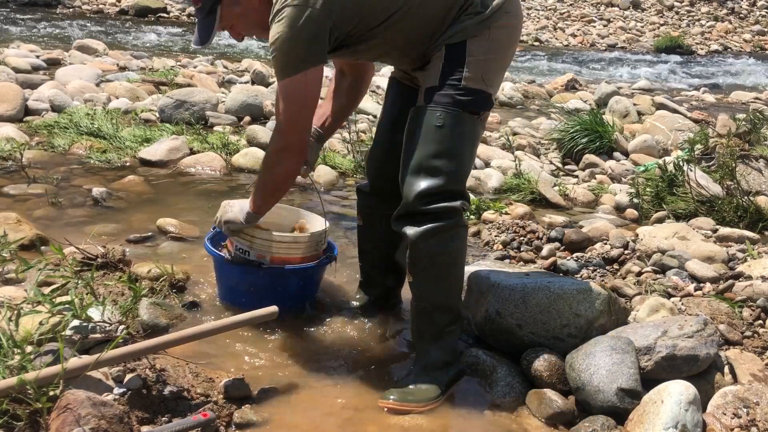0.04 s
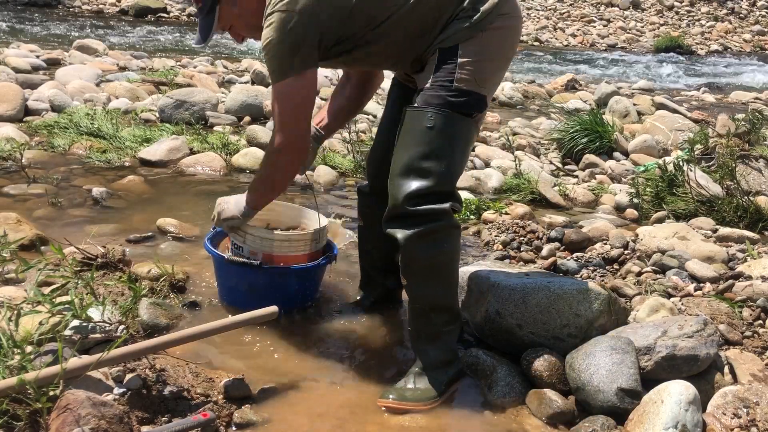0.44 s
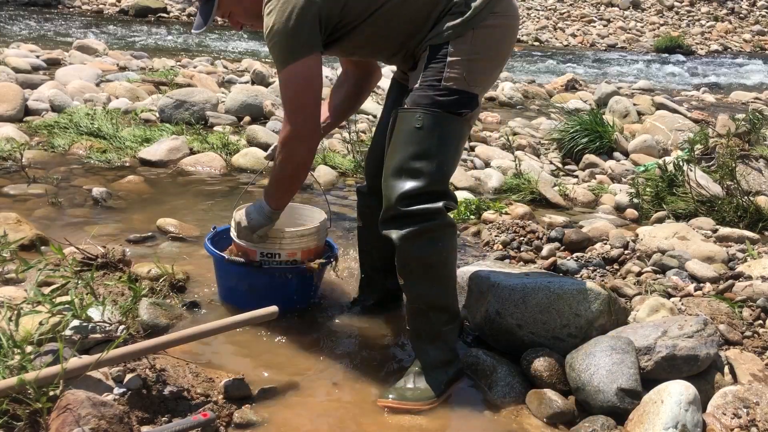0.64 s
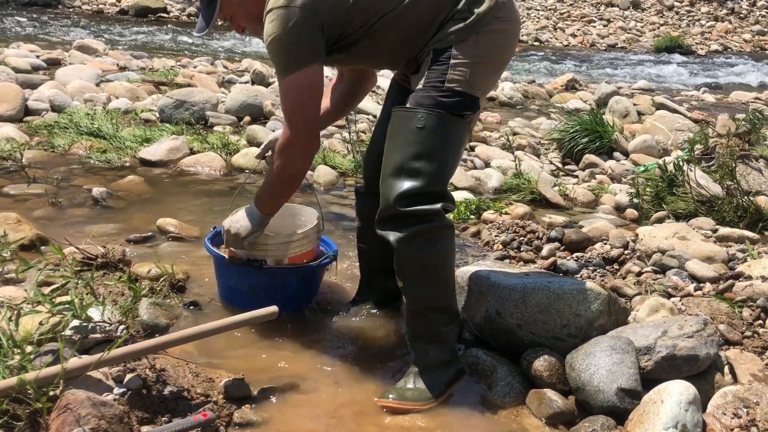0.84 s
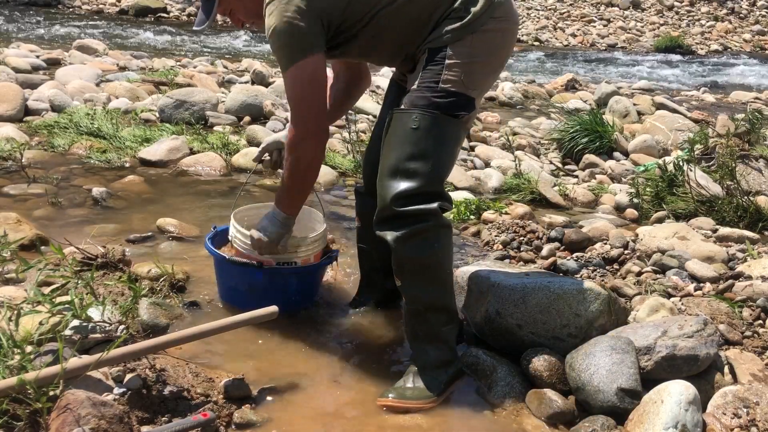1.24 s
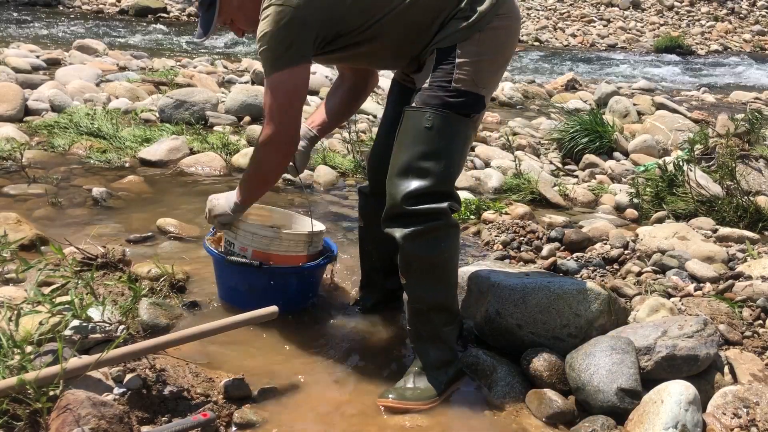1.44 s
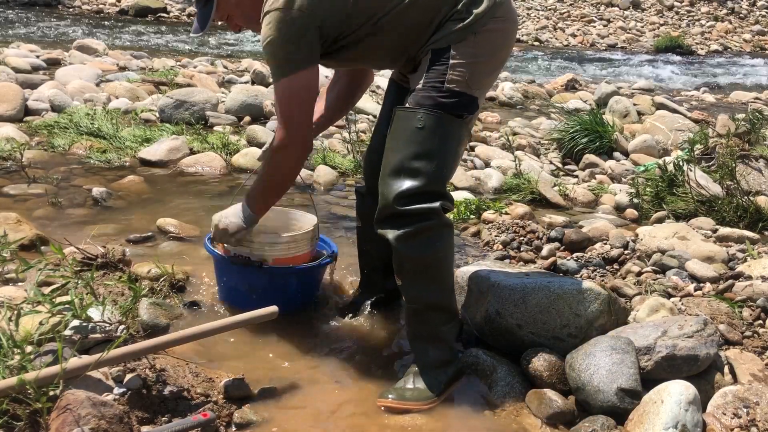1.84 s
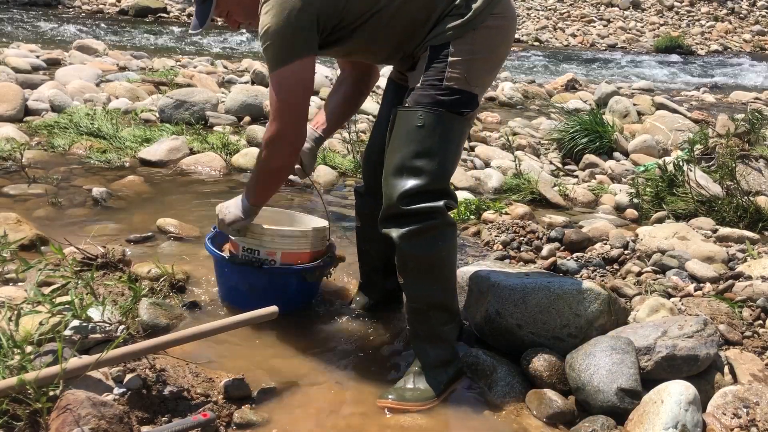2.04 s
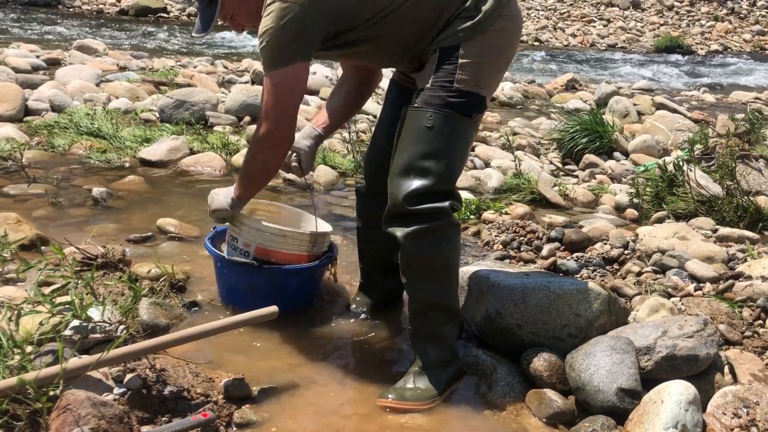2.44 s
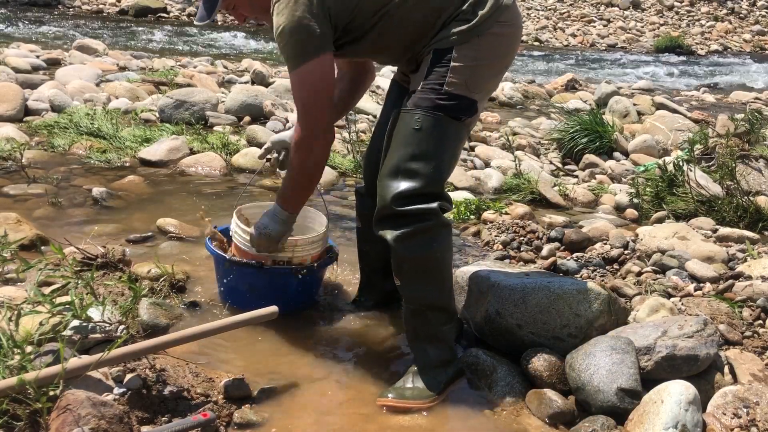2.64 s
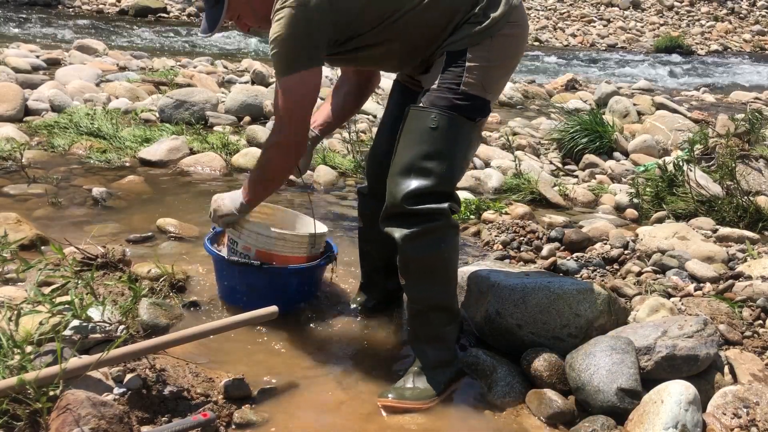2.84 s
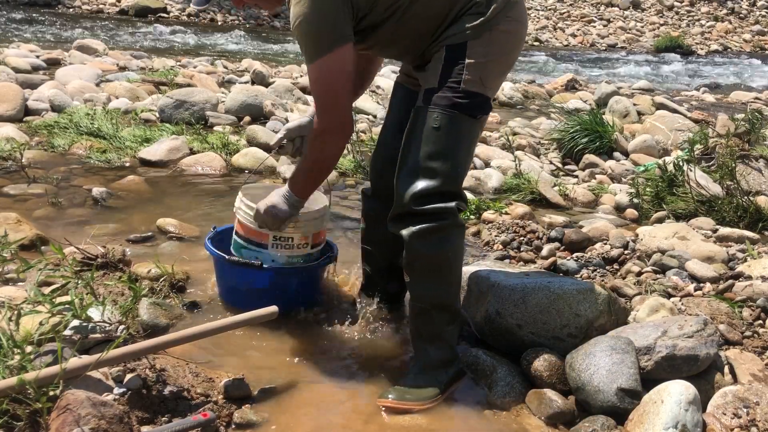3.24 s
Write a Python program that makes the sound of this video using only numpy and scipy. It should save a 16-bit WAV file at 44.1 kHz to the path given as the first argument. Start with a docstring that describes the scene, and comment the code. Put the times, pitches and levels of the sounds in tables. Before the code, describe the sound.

Wet gravel is shaken in a plastic bucket sieve in quick, even strokes. Pebbles clack, grit scrapes and the sieve knocks hollowly against a tub. A river runs faintly behind, and a small splash ends it.

```python
"""Wet gravel is twisted to and fro, about six strokes a second, in a plastic bucket sieve in a tub of water.
Each impact is an impulse filtered by the stone, the bucket's modes and the tub's echo: pebbles clack,
bump the floor and wall, and roll on between strokes. Friction is a dense train of small impacts: grit
scrapes the mesh and a stone grinds along the rim. Flints chink and the sieve thumps the tub.
A river runs behind, and water splashes as the sieve is lifted at the end."""
import sys
import numpy as np
from scipy import signal
from scipy.fft import rfft, irfft, next_fast_len
from scipy.io import wavfile
from scipy.ndimage import uniform_filter1d, map_coordinates

SR = 44100
rng = np.random.default_rng(int(sys.argv[2]) if len(sys.argv) > 2 else 0)


def unload_wav(signal):
    """Save mono or channel-first audio to the path in sys.argv[1] as 16-bit WAV at rate SR, clipped to [-1, 1]."""
    wavfile.write(
        sys.argv[1],
        SR,
        np.round(np.clip(np.atleast_2d(signal).T, -1, 1) * 32767).astype(np.int16),
    )


N = 145530

# Levels in all tables are relative. Spectra (f/Hz, level/dB) of:
RIVER_SPECTRUM = [(25, -23), (50, -32), (90, -7), (140, 0.5), (220, 5), (500, 2), (1000, -0.5), (1800, -11),
                  (3000, -16), (5000, -26.5), (9000, -32.5), (15000, -52)]  # running water
SPILL_SPECTRUM = [(300, -17), (1500, 2), (3300, 5), (5000, -7), (9000, -20), (15000, -24)]  # splashing drops
GRIND_SPECTRUM = [(1500, -32), (2800, -15), (3400, 6.5), (3900, -0.5), (4200, 0), (4650, -9), (5100, -26),
                  (9000, -35)]  # a stone on the rim
FLOOR_SPECTRUM = [(60, -47.5), (160, -24), (270, -18), (350, -11.5), (430, -6), (505, 1.5), (620, -6.5),
                  (900, -18.5), (2000, -46)]  # bumps on the bucket's floor
WALL_SPECTRUM = [(200, -60.5), (550, -20.5), (660, -21.5), (740, -3), (820, -5), (1000, 5.5), (1250, 3),
                 (1700, -18), (3000, -54.5)]  # knocks on its wall
MESH_SPECTRUM = [(500, -55), (1400, -5), (1900, 1.5), (2030, 11), (2130, 5), (2300, 9), (2480, 4),
                 (2850, 0), (3150, 1), (3800, -2.5), (4300, -16), (4750, -11.5), (5300, -48), (9000, -47)]  # grit rasping on the mesh
SAND_SPECTRUM = [(1000, -39), (3500, 9.5), (5000, 2), (6800, -1.5), (8800, -5), (10500, -15.5),
                 (12500, -27), (14500, -37), (16000, -36)]  # fine grains
ROLL_SPECTRUM = [(150, -43), (550, -26.5), (900, -17.5), (1100, -15), (1280, 1), (1450, -2.5), (1620, 3.5),
                 (1820, -4), (2050, -15), (2600, -30), (3500, -24.5), (4500, -38), (9000, -49),
                 (15000, -69.5)]  # gently rolling pebbles
PEBBLE_SPECTRUM = [(100, -54.5), (500, -35), (850, -29), (1080, -9), (1270, 1), (1560, 6), (1820, -2),
                   (2050, -4.5), (2500, -23.5), (3600, -33.5), (5000, -48.5), (9000, -50), (15000, -69)]  # colliding pebbles
# modes of the bucket (f/Hz, level/dB, T60/s)
BUCKET_MODES = [(503, -11.5, 0.058), (756, -18.5, 0.092), (986, -13.5, 0.028), (1260, -13, 0.064),
                (1540, -17, 0.15), (2047, -14.5, 0.081)]
# water leaving the lifted sieve (t/s, level/dB, time constant/s)
SPILL_BURSTS = [(3.239, -59.5, 0.021), (3.248, -62, .005), (3.268, -66, 0.011), (3.285, -49.5, 0.0037)]
# a stone grinding along the rim (centre t/s, half-width/s, level/dB)
RIM_GRINDS = [(1.08, 0.17, -52.5), (2.069, 0.037, -51), (2.232, 0.017, -47.5), (2.261, 0.022, -47)]
# hollow knocks of the sieve against the tub (t/s, f/Hz, level/dB, T60/s)
TUB_THUMPS = [(.348, 472, -34.5, 0.076), (.396, 964, -23, .06), (.402, 747, -28.5, 0.079),
              (.553, 560, -28.5, 0.045), (.697, 804, -29.5, 0.097), (.750, 890, -27.5, 0.11),
              (.765, 400, -39.5, 0.063), (.905, 516, -36.5, 0.14), (1.10, 496, -42, .2),
              (1.235, 531, -41.5, .2), (1.350, 398, -35, 0.11), (1.522, 596, -33.5, 0.069),
              (1.581, 513, -31, 0.087), (1.583, 1028, -20.5, .05), (1.862, 507, -41, 0.053),
              (1.900, 1058, -23, .06), (2.453, 1007, -29.5, 0.11), (2.586, 356, -29.5, 0.071),
              (2.650, 400, -41.5, 0.14), (2.950, 860, -24, 0.048), (2.962, 677, -29.5, 0.087),
              (2.988, 512, -32, 0.089)]
# collisions of small flints (t/s, level/dB, f/Hz)
FLINT_CHINKS = [(0.342, -29, 4070), (.366, -29, 6500), (.398, -33, 8550), (.505, -29, 5550),
                (0.553, -21, 6890), (.701, -23.5, 4260), (1.058, -32, 4230), (1.241, -27, 4630),
                (1.946, -38.5, 7770), (2.094, -37.5, 4660), (2.375, -52, 4200), (2.450, -37, 4100),
                (2.585, -31.5, 5560), (2.620, -36, 5500), (2.950, -36, 4960)]
# hard knocks of large stones (t/s, level/dB)
STONE_KNOCKS = [(0.166, -22), (0.22, -17), (0.247, -21), (0.371, -21), (0.398, -18), (0.423, -22),
                (0.529, -17), (0.658, -20), (0.741, -18), (0.839, -19), (0.873, -15), (1.016, -21),
                (1.172, -17), (1.2, -15), (1.239, -17), (1.344, -21), (1.581, -19), (1.72, -19),
                (1.868, -18), (1.902, -19), (1.918, -21), (2.082, -21), (2.093, -21), (2.231, -21),
                (2.337, -27), (2.373, -27), (2.525, -26), (2.584, -19), (2.763, -23), (2.819, -25),
                (2.95, -18)]
# envelope of the rolling (t/s, level/dB)
ROLLING_LEVELS = [(.125, -70), (.18, -43), (.8, -40.5), (1.4, -40), (1.49, -44), (1.65, -38), (2.02, -42.5),
                  (2.19, -45), (2.38, -40), (2.54, -36.5), (2.72, -43.5), (2.9, -40), (3.03, -48),
                  (3.121, -49.5), (3.18, -73)]
# twists (start t/s, fastest t/s, end t/s, pebble f/Hz, level/dB each of pebbles, floor, wall, mesh, sand)
TWISTS = [(0.164, 0.209, 0.26, 1585, -34.5, -48, -38, -41, -53.5),
          (0.335, 0.38, 0.43, 1593, -40, -50, -39, -42.5, -51),
          (0.498, 0.545, 0.59, 1458, -33, -48, -35.5, -38.5, -48),
          (0.66, 0.72, 0.76, 1540, -36.5, -49, -38, -39.5, -56),
          (0.838, 0.875, 0.9, 1530, -30, -58, -33.5, -37.5, -48),
          (1.012, 1.055, 1.136, 1530, -37, -62, -46, -45.5, -57.5),
          (1.173, 1.222, 1.266, 1496, -30, -54.5, -43, -40, -53.5),
          (1.334, 1.343, 1.433, 1421, -35.5, -56.5, -49.5, -46, -62),
          (1.507, 1.547, 1.625, 1458, -36, -49.5, -42, -41.5, -55.5),
          (1.697, 1.745, 1.772, 1449, -34.5, -58.5, -38.5, -42, -55),
          (1.855, 1.914, 1.955, 1568, -34, -49.5, -47, -45, -58.5),
          (2.062, 2.131, 2.13, 1438, -36, -54.5, -47, -47.5, -70),
          (2.23, 2.255, 2.29, 1557, -32, -55, -44.5, -50, -67),
          (2.421, 2.473, 2.467, 1450, -36.5, -58, -42, -50, -68),
          (2.56, 2.594, 2.65, 1566, -35, -50, -44, -48.5, -59),
          (2.757, 2.793, 2.8, 1556, -36.5, -51, -56, -52, -68),
          (2.919, 2.94, 3.01, 1508, -37, -53, -42.5, -51, -64)]

TUB_T60_S, TUB_DB = 0.038, 3  # short echo inside the tub
HEAP_T60_S = 0.1  # damping by the surrounding gravel
CHATTER = 0.5  # share of the contacts made by one caught, rattling stone
PEBBLE_HZ = 1530  # pitch of a middle-sized pebble
THUMP_DB, KNOCK_DB = -1, -2.5
CHINK_T60_S, CHINK_RING_DB, CHINK_CRACK_DB = 0.0068, -4.5, -5.5
DIP_LEAD_S, DIP_HALF_WIDTH_S, DIP_DB = 0.051, 0.011, -2  # where the twist reverses
STRAY_DB, SNAP_DB = -34, -2.5  # stray grains tick on the mesh; coarse ones crack among the sand
LOW_CUT_HZ, TOP_HZ = 48, 15700


def amp(db):
    """Amplitude ratio of a level in decibels."""
    return 10 ** (np.asarray(db) / 20)


def unit_energy(x):
    """Normalisation to a sum of squares of 1."""
    return x / np.linalg.norm(x)


def gain_at(spectrum, hz):
    """Magnitude response, interpolated in decibels over log frequency."""
    f, db = np.transpose(spectrum)
    return amp(np.interp(np.log(hz + 1), np.log(f + 1), db))


def wobble(knots_per_s):
    """Slow random modulation: a spline through Gaussian values."""
    return map_coordinates(rng.standard_normal(4096), [np.arange(N) * knots_per_s / SR], mode="wrap")


def noise(gain):
    """Spectral shaping: white noise weighted by gain(f), scaled to rms 1."""
    x = irfft(rfft(rng.standard_normal(N)) * gain(np.fft.rfftfreq(N, 1 / SR)), N)
    return x / np.sqrt(np.mean(x ** 2) + 1e-20)


def click(spectrum, stretch, size=2048):
    """A minimum-phase impulse; stretch scales its frequencies, as a stone's size does."""
    cepstrum = irfft(np.log(gain_at(spectrum, np.fft.rfftfreq(size, 1 / SR) / stretch)))
    cepstrum[1:size // 2] *= 2
    cepstrum[size // 2 + 1:] = 0
    return irfft(np.exp(rfft(cepstrum)))


def contact(spectrum, stretch):
    """Convolution of a click with the tub's echo and the bucket's modes, weighted by the spot struck."""
    t = np.arange(SR // 10) / SR
    body = amp(TUB_DB) * unit_energy(rng.standard_normal(len(t)) * amp(-60 * t / TUB_T60_S))
    body[0] += 1  # direct sound
    for hz, db, t60 in BUCKET_MODES:
        mode = unit_energy(np.cos(2 * np.pi * hz * t) * amp(-60 * t / t60))
        body += amp(db - 9.5) * rng.normal(1, 0.18) * mode
    return unit_energy(signal.fftconvolve(click(spectrum, stretch), body))


def shower(force, spectrum, per_s, scatter_db, spread, pitch=1, sizes=14):
    """Shot noise: random contacts scaled by the force, their sizes spanning +-spread in log frequency."""
    chance, strength, free = rng.random(N), rng.standard_normal(N), rng.standard_normal(N)
    caught = free[np.arange(N) * 50 // SR]  # a new stone every 20 ms
    place = np.log(pitch) / spread + np.where(rng.random(N) < CHATTER, caught, free) / 2
    size = np.clip(np.round((place + 1) / 2 * (sizes - 1)), 0, sizes - 1)
    hits = (chance < per_s / SR) * amp(scatter_db * np.minimum(strength, 2)) * rng.choice([-1, 1], N)
    local_power = np.abs(uniform_filter1d(hits ** 2, size=800)) + np.mean(hits ** 2) / 10
    hits = force * hits / np.sqrt(local_power)
    stretches = np.exp(spread * np.linspace(-1, 1, sizes))
    return sum(signal.oaconvolve(hits * (size == k), contact(spectrum, stretch))[:N]
               for k, stretch in enumerate(stretches))


def rings(rows, attack_s, roughness):
    """Damped oscillations (t/s, f/Hz, level/dB, T60/s) whose phase takes one random step a cycle."""
    out, t = np.zeros(N + SR), np.arange(SR // 6) / SR
    for start, hz, db, t60 in rows:
        drift = np.interp(t * hz, np.arange(len(t)), np.cumsum(rng.standard_normal(len(t))))
        envelope = amp(db - 60 * t / t60) * (1 - np.exp(-t / attack_s))
        out[round(start * SR):][:len(t)] += envelope * np.sin(2 * np.pi * hz * t + roughness * drift)
    return out[:N]


def river():
    """Running water: broadband noise with slight amplitude modulation, over a faint narrow-band drone."""
    flow = amp(-59.5 + 0.4 * wobble(knots_per_s=24.4)) * noise(lambda hz: gain_at(RIVER_SPECTRUM, hz))
    drone = amp(-80) * noise(lambda hz: 1 / (1 + ((hz - 73.7) / 1.9) ** 2))
    return flow + drone


def spill():
    """Water falls from the lifted sieve in exponentially decaying bursts of drop impacts."""
    t = np.arange(N) / SR
    force = sum(amp(db) * (t >= start) * np.exp(-np.abs(t - start) / decay)
                for start, db, decay in SPILL_BURSTS)
    return shower(force, SPILL_SPECTRUM, per_s=1900, scatter_db=6, spread=0.48)


def rim_grinds():
    """Friction: a stone judders along the rim in bright Gaussian swells."""
    t = np.arange(N) / SR
    force = sum(amp(db) * np.exp(-2 * ((t - centre) / width) ** 2) for centre, width, db in RIM_GRINDS)
    return shower(force, GRIND_SPECTRUM, per_s=760, scatter_db=7.5, spread=0.06, sizes=4)


def tub_thumps():
    """Free vibration: each bump of the sieve on the tub excites one damped, hollow mode."""
    return amp(THUMP_DB) * rings(TUB_THUMPS, attack_s=0.0016, roughness=0.6)


def flint_chinks():
    """Hard impact: small flints collide with a broadband crack and a brief, high ring."""
    cracks = np.zeros(N + SR)
    for start, db, _ in FLINT_CHINKS:
        crack = contact(SAND_SPECTRUM, np.exp(rng.normal(0, 0.082)))
        cracks[round(start * SR):][:len(crack)] += amp(db + CHINK_CRACK_DB) * crack / np.abs(crack).max()
    modes = [(start, hz, db, CHINK_T60_S) for start, db, hz in FLINT_CHINKS]
    return cracks[:N] + amp(CHINK_RING_DB) * rings(modes, attack_s=0.0011, roughness=0.77)


def stone_knocks():
    """Damped impact: large stones strike singly, with a faint tick, and the heap absorbs their ringing."""
    out = np.zeros(N + SR)
    for start, db in STONE_KNOCKS:
        stretch = np.exp(rng.normal(0, 0.032))
        knock = (contact(PEBBLE_SPECTRUM, stretch)
                 + amp(-17.5) * contact(MESH_SPECTRUM, stretch)
                 + amp(-35.5) * contact(SAND_SPECTRUM, stretch))
        knock *= amp(-60 * np.arange(len(knock)) / SR / HEAP_T60_S)
        out[round(start * SR):][:len(knock)] += amp(db + KNOCK_DB) * knock / np.abs(knock).max()
    return out[:N]


def rolling_force():
    """Inertia keeps pebbles rolling between strokes; they falter slightly before each new one."""
    t = np.arange(N) / SR
    dips = sum(np.exp(-((t - start + DIP_LEAD_S) / DIP_HALF_WIDTH_S) ** 2) for start, *_ in TWISTS)
    return amp(np.interp(t, *np.transpose(ROLLING_LEVELS)) + DIP_DB * dips)


def twist_force(levels, attack_s, release_s, swell_db):
    """Strokes add in power; each builds up, swells towards its fastest moment and dies away."""
    t, power = np.arange(N) / SR, np.zeros(N)
    for (start, fastest, end, *_), db in zip(TWISTS, levels):
        edges = np.exp(-np.maximum(start - t, 0) / attack_s - np.maximum(t - end, 0) / release_s)
        swell = swell_db * np.interp(t, [start, fastest, end], [-0.5, 0.5, -0.5])
        power += (edges * amp(db + swell)) ** 2
    return np.sqrt(power)


def gravel():
    """Granular flow: each twist drives collisions and friction; sliding sand swells most with speed."""
    _, fastest, _, pebble_hz, pebble_db, floor_db, wall_db, mesh_db, sand_db = np.transpose(TWISTS)
    pitch = np.interp(np.arange(N) / SR, fastest, pebble_hz) / PEBBLE_HZ
    rolling = rolling_force()
    clack = twist_force(pebble_db, attack_s=0.002, release_s=0.0057, swell_db=3)
    floor = twist_force(floor_db, attack_s=0.0036, release_s=0.027, swell_db=6)
    floor = np.hypot(floor, amp(-20.5) * rolling)  # rolling pebbles also bump the floor
    wall = twist_force(wall_db, attack_s=0.014, release_s=0.034, swell_db=5)
    mesh = twist_force(mesh_db + 0.8, attack_s=0.011, release_s=0.029, swell_db=5.5)
    sand = twist_force(sand_db, attack_s=0.014, release_s=0.032, swell_db=8.5)
    return (shower(clack, PEBBLE_SPECTRUM, per_s=1100, scatter_db=4, spread=0.16, pitch=pitch)
            + shower(rolling, ROLL_SPECTRUM, per_s=450, scatter_db=5, spread=0.11)
            + shower(floor, FLOOR_SPECTRUM, per_s=400, scatter_db=4.5, spread=0.24)
            + shower(wall, WALL_SPECTRUM, per_s=700, scatter_db=2.5, spread=0.038)
            + shower(mesh, MESH_SPECTRUM, per_s=1800, scatter_db=9, spread=0.017)
            + shower(amp(STRAY_DB) * rolling, SAND_SPECTRUM, per_s=35, scatter_db=7, spread=0.3, sizes=4)
            + shower(sand, SAND_SPECTRUM, per_s=4000, scatter_db=8, spread=0.071)
            + shower(amp(SNAP_DB) * sand, SAND_SPECTRUM, per_s=54, scatter_db=15, spread=0.2, sizes=6))


def scene():
    """Superposition in open air: the sieve and the river add in one channel."""
    return (gravel() + rim_grinds() + stone_knocks() + tub_thumps() + flint_chinks()
            + river() + spill())[None]


def record(dry):
    """Band limiting: a second-order high-pass thins the deep bass, and the highest treble is cut off."""
    size = next_fast_len(N + SR // 2)
    hz = np.fft.rfftfreq(size, 1 / SR)
    high_pass = hz ** 2 / np.hypot(hz ** 2, LOW_CUT_HZ ** 2)
    return irfft(rfft(dry, size) * high_pass * (hz < TOP_HZ), size)[..., :N]


dry = scene()
out = record(dry)
unload_wav(out)
```